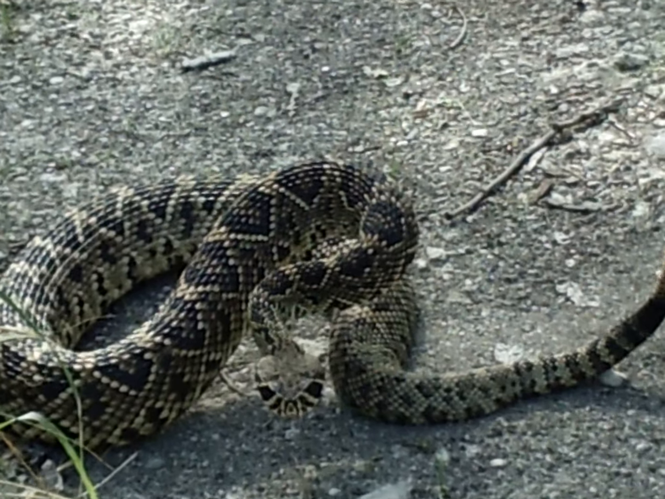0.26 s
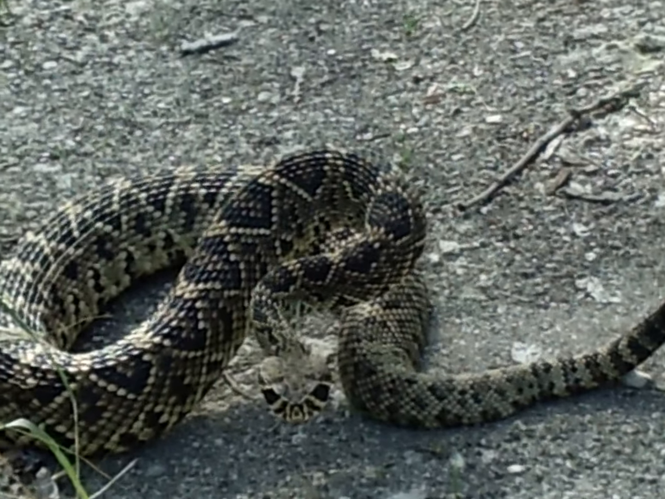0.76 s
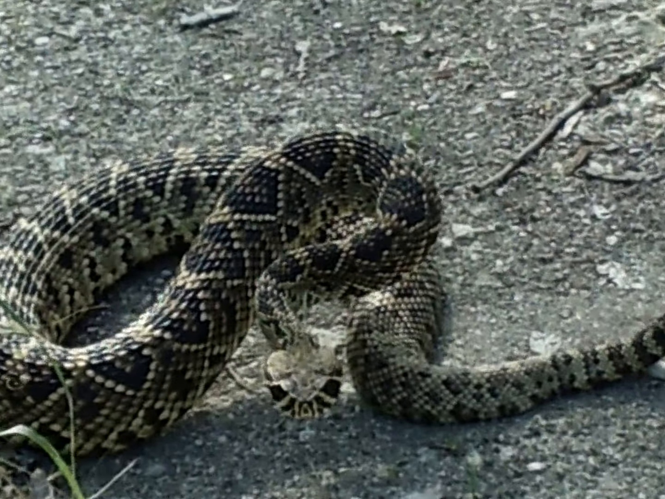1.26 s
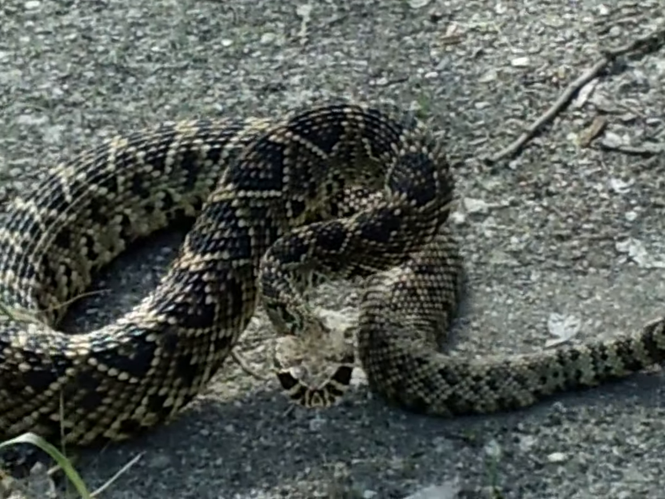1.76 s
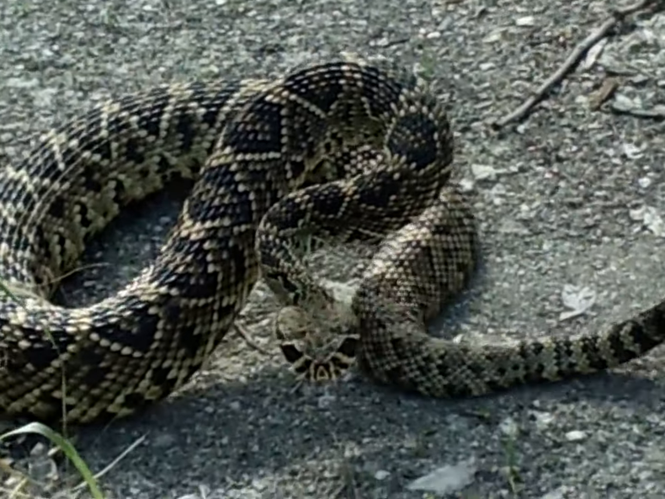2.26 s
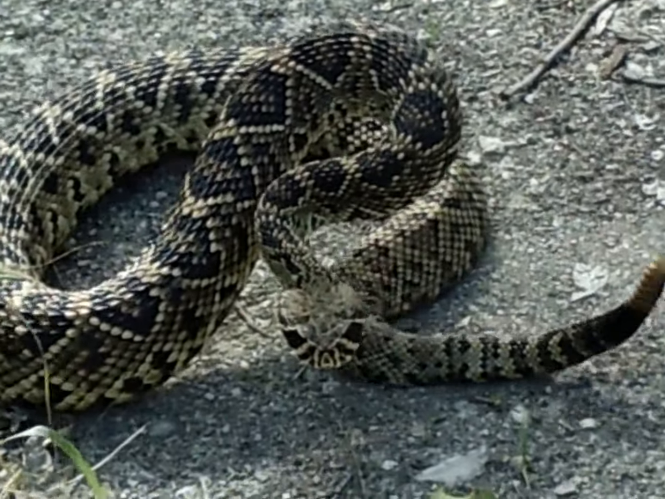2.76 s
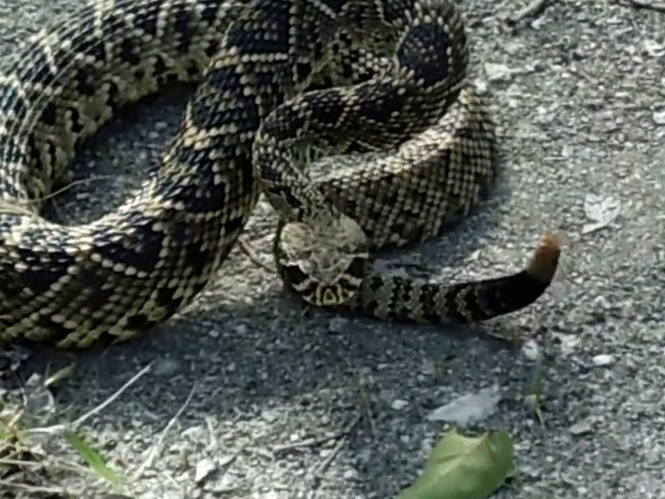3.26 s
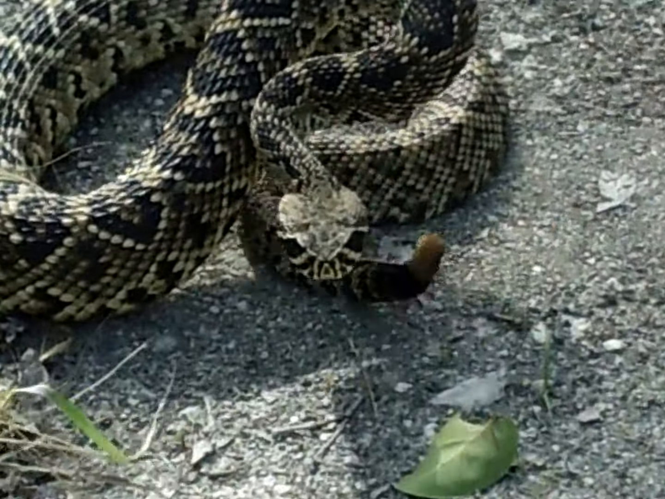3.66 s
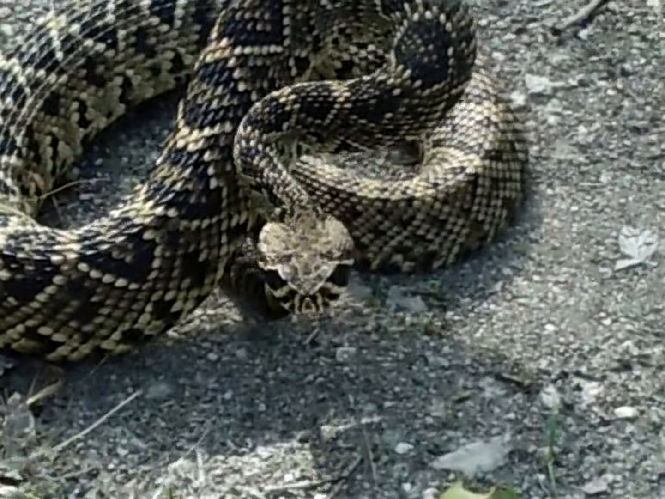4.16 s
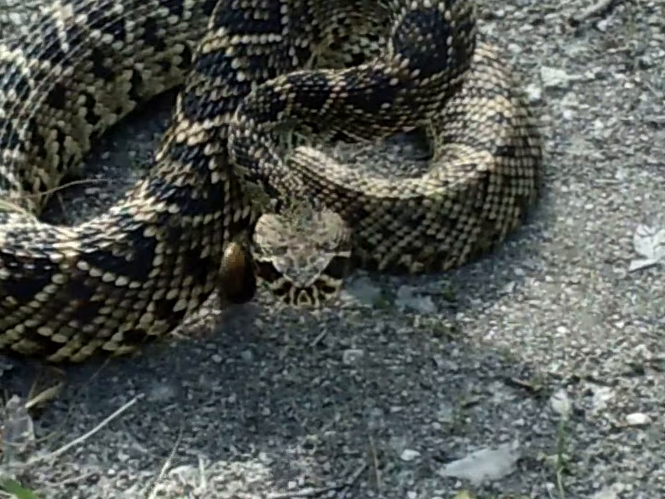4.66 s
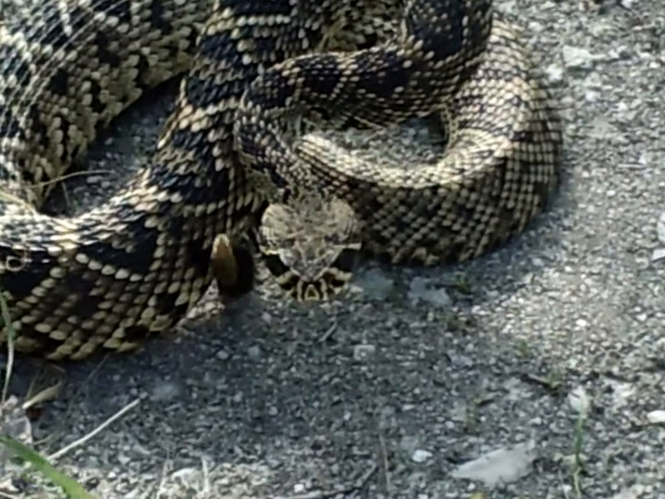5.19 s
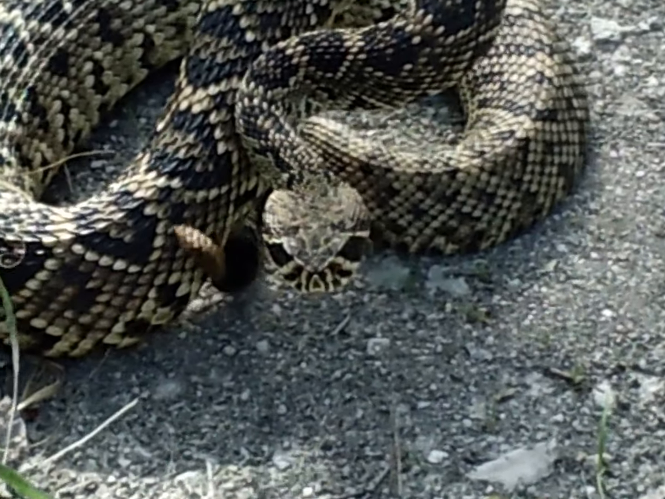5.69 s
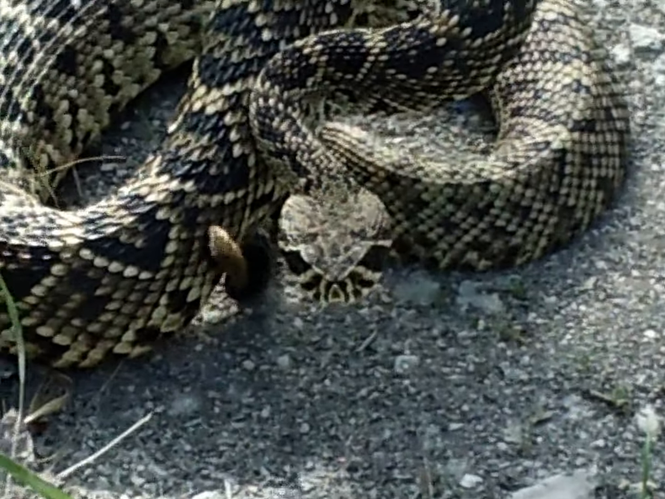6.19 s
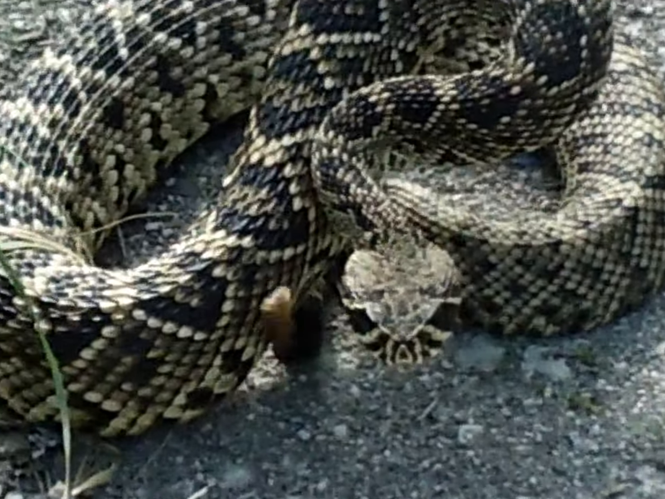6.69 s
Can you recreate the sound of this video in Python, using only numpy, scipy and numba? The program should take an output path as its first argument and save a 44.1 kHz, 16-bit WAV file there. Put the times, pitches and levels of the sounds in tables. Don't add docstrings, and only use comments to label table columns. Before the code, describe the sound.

A rattlesnake shakes its tail without stopping, a metre or two from a small mono camera outdoors. The dry, bright buzz is made of dense tiny clicks, stuttering at first, then smoother and firmer, and finally louder and rougher with small gaps. Faint low wind rumble and open-air hush lie beneath, with a light finger tap near the middle.

```python
import sys
import numpy as np
from scipy import signal
from scipy.fft import rfft, irfft
from scipy.io import wavfile
from scipy.ndimage import uniform_filter1d
from numba import njit

SR = 44100
rng = np.random.default_rng(int(sys.argv[2]) if len(sys.argv) > 2 else 0)


def magnitude_from_level(level_db):
    exponent = np.asarray(level_db, float) / 20
    return 10 ** exponent


def put_to_file(sound):
    columns = np.atleast_2d(sound).T
    safe = np.clip(columns, -1, 1)
    whole_steps = np.round(safe * 32767)
    wavfile.write(sys.argv[1], SR, whole_steps.astype(np.int16))


N = 305613


def unit(x):
    return x / np.sqrt(np.mean(x ** 2))


def curve(table):
    time_s, *columns = np.transpose(table)
    return [np.interp(np.arange(N) / SR, time_s, column) for column in columns]


def bump(centre_s, length_s):
    return np.exp(-.5 * ((np.arange(N) / SR - centre_s) / length_s) ** 2)


def walk(rate_hz):
    hold = int(SR / rate_hz)
    steps = np.repeat(rng.standard_normal(N // hold + 1), hold)
    return 1.3 * uniform_filter1d(uniform_filter1d(steps, hold), hold)[:N]


def quiver(rate_hz):
    wobble = walk(rate_hz)
    return wobble - uniform_filter1d(wobble, int(4 * SR / rate_hz))


def ring(x, hz, width_hz, passes=2):
    for _ in range(passes):
        x = signal.lfilter(*signal.iirpeak(hz, hz / width_hz, fs=SR), x)
    return x


@njit
def moving_ring(x, hz, width_hz):
    y, band, low = np.empty(len(x)), 0., 0.
    for i in range(len(x)):
        g, damping = np.tan(np.pi * hz[i] / SR), width_hz[i] / hz[i]
        v = (band + g * (x[i] - low)) / (1 + g * (g + damping))
        band = 2 * v - band
        low += 2 * g * v
        y[i] = damping * v
    return y


def hush():
    # (frequency [Hz], level [dB per Hz])
    spectrum = [(15, -51), (25, -1.5), (86, -2.5), (243, -11), (300, -13), (425, -15.5), (468, -16.5),
                (1270, -20.5), (1540, -23.5), (2500, -35), (3250, -36), (5500, -120)]
    hz, db = np.transpose(spectrum)
    f = np.fft.rfftfreq(N, 1 / SR) + 1
    gain = magnitude_from_level(np.interp(np.log(f), np.log(hz), db))
    noise = irfft(rfft(rng.standard_normal(N)) * gain, N)
    return magnitude_from_level(-59) * unit(noise)


def wind_band(low_hz, high_hz):
    band = signal.butter(2, [low_hz, high_hz], "band", fs=SR, output="sos")
    return unit(signal.sosfilt(band, rng.standard_normal(N)))


def wind():
    # (time [s], deep buffeting over calm [dB], higher puffs over calm [dB])
    gusts = [(.1, 5, -2), (.46, 5, 1), (1.13, 13, -2), (1.32, 13, -1), (1.43, 11, 2), (1.63, 14, 3),
             (1.78, 11, -2), (1.98, 14, -1), (2.6, 10, 3), (2.8, 7, -7), (3.15, 18, -6), (3.53, 11, -5),
             (3.72, 8, 1), (4.07, 11, -2), (4.3, 9, -2), (5.0, 4, 5), (5.37, 10, -1), (5.62, 7, 3),
             (5.9, 6, 4), (6.15, 4, 5.5), (6.57, 9, 1), (6.75, 4, 1)]
    gust_length_s, calm_db = 0.058, -63.5
    deep, puff = wind_band(18, 41), wind_band(55, 136)
    deep_gust_db = sum(deep_db * bump(s, gust_length_s) for s, deep_db, _ in gusts)
    puff_gust_db = sum(puff_db * bump(s, gust_length_s) for s, _, puff_db in gusts)
    deep_level = magnitude_from_level(calm_db + deep_gust_db + 1.5 * walk(7))
    puff_level = magnitude_from_level(calm_db + puff_gust_db)
    buffet = magnitude_from_level(-47) * bump(5.375, .035)
    return deep_level * deep + puff_level * puff + buffet * (deep + puff)


def ticks():
    # (time [s], peak level [dB], ring [Hz])
    taps = [
        (3.053, -30, 1200),
        (3.924, -39, 1100),
        (6.444, -41, 900),
    ]
    out = np.zeros(N + 2048)
    impulse = np.eye(1, 2048, 100)[0]
    thud = ring(impulse, 440, 560)
    for s, db, hz in taps:
        crack = ring(impulse, hz, 2.14 * hz)
        tap = crack / crack.max() + 0.22 * thud / thud.max()
        out[int(s * SR):][:len(tap)] += magnitude_from_level(db) * tap
    return out[:N]


def slack():
    # (first dip [s], last dip [s], gap [ms], dip [dB])
    slack_runs = [(.007, .197, 31.6, -5.5), (.3, .501, 33.5, -3.5), (0.542, .649, 35, -4.5),
                  (0.685, .806, 42, -1), (0.886, 1.235, 25.5, -2), (1.349, 1.46, 30, -1),
                  (3.12, 3.213, 27.3, -2), (5.06, 5.545, 32.2, -3), (5.585, 5.792, 35.2, -4),
                  (5.816, 6.045, 29.6, -2.5), (6.239, 6.366, 28, -2.5), (6.479, 6.625, 34, 0.5)]
    # (time [s], change [dB]: below 0 a deeper fall, above 0 a brief
    lulls = [(.039, -3), (.07, -7), (.132, -11), (.164, -3), (.253, -10), (.3, -7), (.434, -9), (.467, -6),
             (.577, -4.5), (.61, 2), (.69, -7), (.719, -8), (.806, -7), (.995, -5), (5.001, -7),
             (5.382, -3.5), (5.416, -3), (5.654, -3), (5.722, 4), (5.877, -8.5), (6.661, -11), (6.745, -4),
             (6.834, -4), (6.922, -7)]
    run_dips = []
    for first_s, last_s, gap_ms, db in slack_runs:
        for s in np.arange(first_s, last_s + gap_ms / 2000, gap_ms / 1000):
            run_dips.append((s, db))
    out = 0
    for dips, length_ms in ((run_dips, 13.8), (lulls, 4.9)):
        s, db = np.transpose(dips)
        marks = np.bincount((s * SR).astype(int), db, N)[:N]
        bell = signal.windows.gaussian(2001, length_ms * .00038 * SR)
        out = out + 1.4 * signal.fftconvolve(marks, bell, "same")
    return out


def shaking():
    # (time [s], rate [strokes/s], share of knocking locked to the stroke [0-1])
    beat = [(0, 148.91, .19), (.5, 151.57, .17), (.9, 154.84, .22), (1.25, 155.58, .29), (1.6, 160.95, .53),
            (1.9, 165.11, .57), (2.2, 163.75, .48), (2.6, 157.89, .5), (3.1, 155.49, .41),
            (3.6, 157.98, .42), (4.15, 161.44, .31), (4.5, 158.02, .38), (4.9, 150.17, .29),
            (5.35, 145.99, .13), (5.8, 149.37, .15), (6.3, 153.36, .18), (6.6, 149.59, .17),
            (6.93, 148.52, .14)]
    rate, locked = curve(beat)
    strokes = .76 + np.cumsum(rate) / SR
    phase = 2 * np.pi * strokes
    stroke_db = locked * (4.6 * np.cos(phase) + 2.2 * np.cos(2 * phase - .9))
    loose_db = locked * 2.2 * np.cos(phase + 1.0)
    swing_db = locked * 0.5 * np.cos(phase / 2 - 1.3)
    stutter_db = 2.2 * (.65 - locked) * (quiver(150) + quiver(320))
    force = magnitude_from_level(np.array([stroke_db, loose_db]) + slack() + swing_db + stutter_db)
    span = int(.12 * SR)
    force /= np.sqrt(uniform_filter1d(uniform_filter1d(force ** 2, span), span))
    count = np.floor(strokes - .11)
    thump_db = 6.0 * (count % 2) + 3.5 * rng.standard_normal(N)
    thumps = np.diff(count, prepend=0) * locked * rng.choice([-1, 1], N) * magnitude_from_level(thump_db)
    return force[0], force[1], thumps


def body(strikes, modes):
    return sum(magnitude_from_level(db) * unit(ring(strikes(), hz, width_hz)) for hz, width_hz, db in modes)


def shell(clicks, modes):
    clicks = clicks * magnitude_from_level(1.3 * quiver(170))
    wide_modes = [(hz, 1.46 * width_hz, db) for hz, width_hz, db in modes]
    return body(lambda: clicks * rng.standard_normal(N), wide_modes)


def shell_rings(clicks, low_db, turned, middle_hz, cover):
    # (frequency [Hz], width [Hz], level [dB])
    low_shell = [(4614, 730, -0.5), (3960, 670, -11), (5300, 880, -9.5)]
    high_shell = [(7860, 900, 1), (6470, 860, -15.5), (7900, 1560, 3)]
    shell_edges = [(10240, 1300, 2), (12400, 1500, 3), (13860, 910, -7), (15300, 1200, -12),
                   (10470, 2700, -5)]
    middle_db = 3 - 8.5 * turned
    high_db = -11.5 - 3.5 * turned
    edge_db = -13.14 - 4.5 * turned
    middle_db += 3.5 * bump(4.02, .045)
    high_db += 6.5 * bump(4.47, 0.06) + 1 * bump(3.9, 0.087)
    width_hz = 1325 * magnitude_from_level(0.85 * (low_db - low_db.mean()) + 3.1 * cover)
    middle = clicks * rng.standard_normal(N)
    for _ in range(2):
        middle = moving_ring(middle, middle_hz, width_hz)
    rings = unit(shell(clicks, low_shell))
    rings += magnitude_from_level(middle_db) * unit(middle / np.sqrt(width_hz))
    rings += magnitude_from_level(high_db) * unit(shell(clicks, high_shell))
    rings += magnitude_from_level(edge_db) * unit(shell(clicks, shell_edges))
    return signal.sosfilt(signal.butter(4, 3300, "high", fs=SR, output="sos"), rings)


def coil_shadow(sound, cover):
    # (frequency [Hz], width [Hz], share cancelled [0-1])
    coil_dips = [(2700, 2320, 0.7), (8750, 500, 0.3), (11650, 1050, 0.53)]
    close_dips = [(9250, 800, .55), (15300, 1500, .4)]
    for hz, width_hz, share in coil_dips:
        sound = sound - share * cover * ring(sound, hz, width_hz, passes=1)
    touching = bump(5.05, 0.46)
    for hz, width_hz, share in close_dips:
        sound = sound - share * touching * ring(sound, hz, width_hz, passes=1)
    return sound


def rattle():
    # (time [s], low shell level [dB], share turned away [0-1], middle shell [Hz])
    tail = [(0, -32.5, .2, 6360), (.6, -31, 0.3, 6350), (1.2, -29.5, 0.07, 6280), (1.75, -27, 0.03, 6220),
            (2.4, -28, 0.07, 6260), (3.3, -27, 0.18, 6170), (3.65, -27.5, 0.24, 6320),
            (3.93, -26, .1, 6100), (4.07, -29, 0.16, 6370), (4.3, -25, 0.37, 6200), (4.44, -26, 0.4, 6700),
            (4.7, -24.5, .55, 6000), (5.1, -25, 0.65, 5800), (5.35, -24, 1, 5900), (5.67, -25.5, 0.8, 6000),
            (6.05, -21.5, 1, 5800), (6.7, -23, 1, 6400), (6.93, -22.5, 1, 6000)]
    # (time [s], share hidden [0-1])
    hiding = [(0, 0.38), (1, 0.21), (3.9, 0.18), (4.15, 0.43), (4.35, 1), (4.45, 0.84), (5.8, 0.85),
              (6.2, 0.77), (6.93, 0.7)]
    # (frequency [Hz], width [Hz], level against the low shell [dB])
    loose_tip = [(3488, 750, -16), (3030, 440, -27)]
    dull_knock = [(2520, 590, -33.5)]
    coil_boom = [(1300, 300, -49.5), (1673, 340, -46.5)]
    chain_thump = [(2030, 420, -38), (1350, 600, -47)]
    low_db, turned, middle_hz = curve(tail)
    cover = curve(hiding)[0]
    beating, loose, thumps = shaking()
    struck = rng.random(N) < 11000 / SR
    sizes = struck * magnitude_from_level(4.3 * rng.random(N))

    def loose_strikes():
        return loose * sizes * rng.standard_normal(N)

    sound = shell_rings(beating * sizes, low_db, turned, middle_hz, cover)
    sound += body(loose_strikes, loose_tip)
    sound += body(lambda: thumps, chain_thump)
    sound += magnitude_from_level(-5.0 * cover) * body(loose_strikes, dull_knock)
    sound += magnitude_from_level(0.83 * cover) * body(loose_strikes, coil_boom)
    return magnitude_from_level(low_db) * coil_shadow(sound, cover)


def scene():
    return (hush() + wind() + ticks() + rattle())[None]


def roll_off(x):
    return signal.sosfilt(signal.butter(12, 15740, fs=SR, output="sos"), x)


def record(dry):
    ceiling = .6
    rounded = ceiling * np.tanh(dry / ceiling)
    top_cut = signal.ellip(10, .3, 60, 15800, fs=SR, output="sos")
    return roll_off(signal.sosfilt(top_cut, rounded))


dry = scene()
out = record(dry)
put_to_file(out)
```